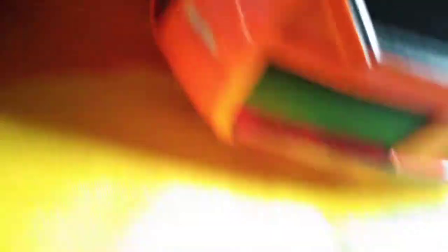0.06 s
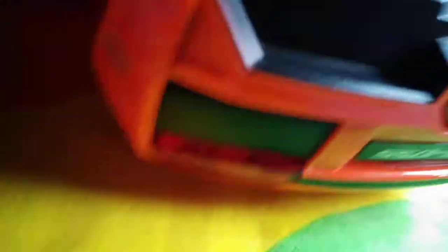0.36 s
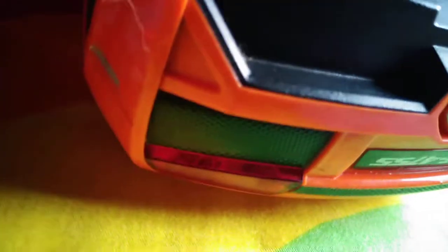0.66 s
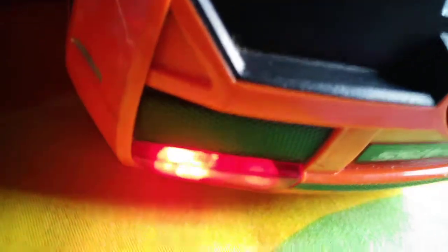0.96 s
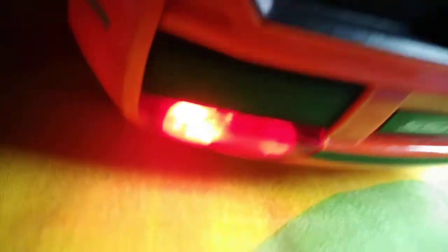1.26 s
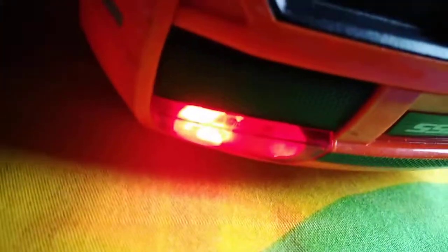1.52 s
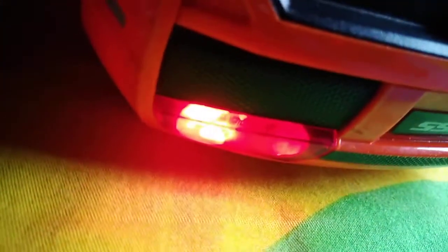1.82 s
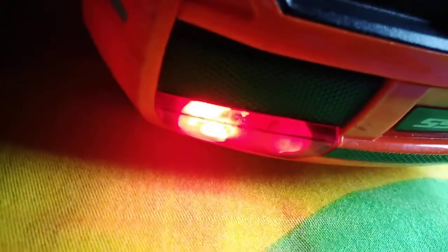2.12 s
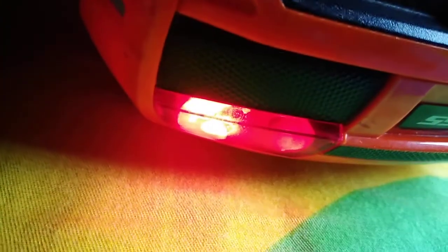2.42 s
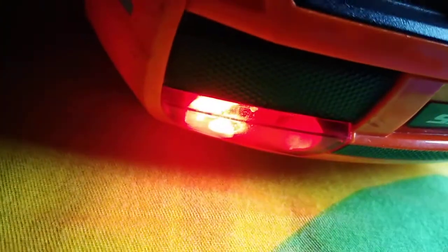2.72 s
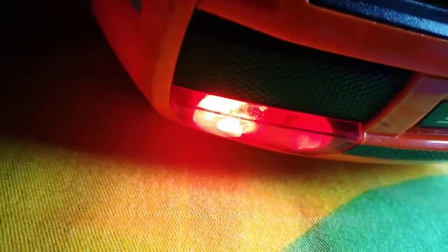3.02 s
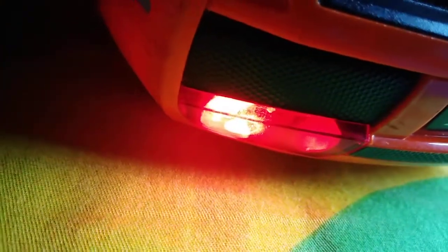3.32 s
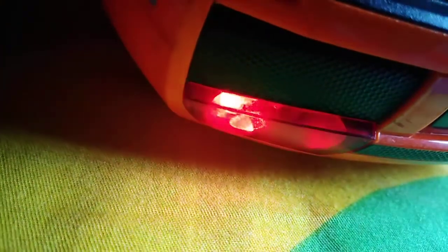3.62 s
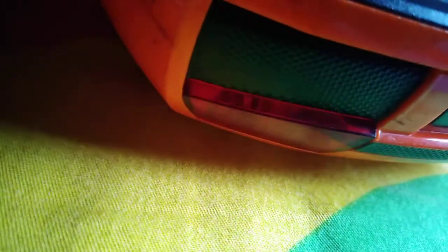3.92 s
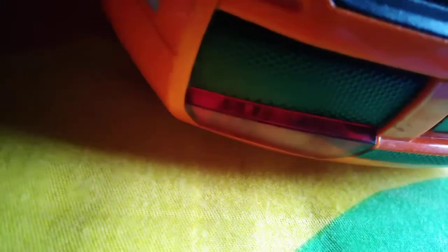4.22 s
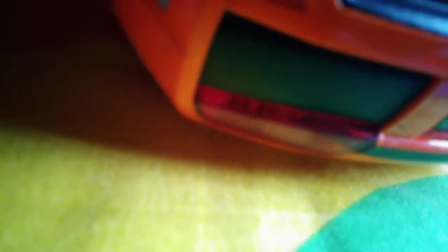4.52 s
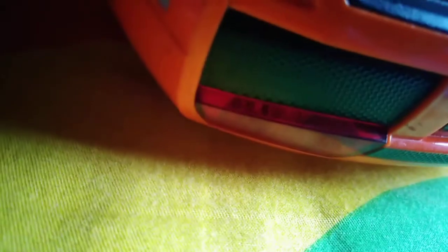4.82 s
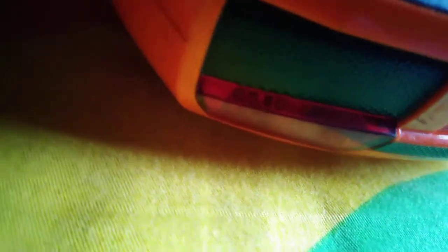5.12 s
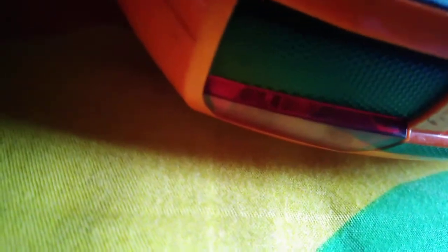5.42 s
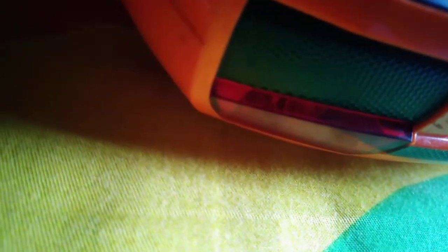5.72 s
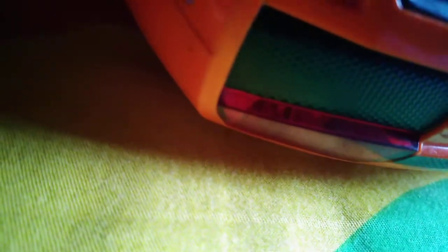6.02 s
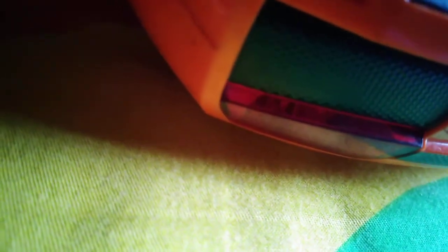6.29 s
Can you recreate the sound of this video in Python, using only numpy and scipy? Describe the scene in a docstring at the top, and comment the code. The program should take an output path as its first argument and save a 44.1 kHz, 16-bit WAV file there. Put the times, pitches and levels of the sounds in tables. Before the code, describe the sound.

A plastic toy car is handled close to the microphone in a small quiet room. After a brief rub of a hand and a few clicks, its electric motor spins up to a steady high whine, with gears chattering and the hollow body droning. A switch clicks and the gears wind down, falling in pitch. Another click and knock start a second run, which holds, then begins slowing with a few gritty wheel scrapes.

```python
"""In a small quiet room, a plastic toy car is handled close by and switched on twice.
Each time its gears whine up to speed, hold and coast down; the pitch is the rate at which teeth mesh.
Impacts of the loose teeth excite resonances: the hollow body drones and the thin walls chatter.
The slow gear groans and a wobbling wheel scrapes now and then; the switch and the shell click."""
import sys
import numpy as np
from scipy import signal
from scipy.fft import rfft, irfft, next_fast_len
from scipy.io import wavfile
from scipy.ndimage import uniform_filter1d

SR = 44100
rng = np.random.default_rng(int(sys.argv[2]) if len(sys.argv) > 2 else 0)


def generate_wav(signal):
    """Clip the signal to [-1, 1] and save it as 16-bit WAV at the path in sys.argv[1]."""
    frames = np.transpose(np.atleast_2d(signal))
    scaled = np.clip(frames, -1, 1) * 32767
    pcm = np.round(scaled).astype(np.int16)
    wavfile.write(sys.argv[1], SR, pcm)


N = 289031
T = np.arange(N) / SR
TEETH, WHEEL_RATIO = 12, 5  # teeth on the gear; its turns for one turn of the wheel
LET_GO_S, TAKE_UP_S = 0.043, 0.099  # the teeth go slack without current, and mesh again

# motor runs: (on [s], off [s], top tooth rate [Hz], speed at switch-on [share], spin-up [s], drag [Hz],
# drag eases from [s], easing [s], friction [Hz/s])
RUNS = [(.75, 3.219, 682, .12, .117, 39.4, 1.729, .172, 535),
        (4.135, 6.12, 677, .29, .14, 41, 4.135, .543, 488)]
# resonances of the hollow body: (frequency [Hz], level [dB])
BODY = [(18, -101), (30, -92), (86, -20), (154, -19), (314, -13), (342, -8), (405, -15.5), (569, -4.5),
        (620, 0), (687, 2.5), (828, -1), (1020, -12), (1250, -8), (1330, -11.5), (1750, -16), (2280, -63),
        (3850, -120)]


def amp(db):
    """Decibels to amplitude ratio."""
    return 10 ** (np.asarray(db) / 20)


def unit(x):
    """Normalisation to rms 1."""
    return x / np.sqrt(np.mean(x ** 2) + 1e-20)


def read(points, hz):
    """Interpolation on a log-frequency axis."""
    f, value = np.transpose(points)
    return np.interp(np.log(hz + 1), np.log(f + 1), value)


def noise():
    """Two uncorrelated white noises."""
    return rng.standard_normal((2, N))


def wander(hz):
    """Random modulation: noise of rms 1, low-passed at the given rate."""
    f = np.fft.rfftfreq(N, 1 / SR)
    return unit(irfft(rfft(rng.standard_normal(N)) / (1 + (f / hz) ** 4), N))


def colour(x, points, size=4096):
    """Source and filter: a causal response of unit energy imposes the given spectral shape."""
    hz = abs(np.fft.fftfreq(size, 1 / SR))
    log_gain = np.log(amp(np.maximum(read(points, hz), -100)))
    ring = np.fft.ifft(np.exp(np.conj(signal.hilbert(log_gain)))).real[:size // 2]
    return signal.oaconvolve(x, ring[None] / np.linalg.norm(ring), axes=1)[:, :N]


def echoes(x, t60, delay):
    """Diffuse reflections: a decaying noise response of unit energy, different on each side."""
    t = T[:int(1.2 * t60 * SR)]
    tail = rng.standard_normal((2, SR))[:, :len(t)] * amp(-60 * t / t60) * np.clip(t / delay - 1, 0, 1)
    return signal.oaconvolve(x, tail / np.linalg.norm(tail, axis=1, keepdims=True), axes=1)[:, :N]


def blows(times, levels_db, t60s):
    """Damped vibration after impacts: noise bursts that decay exponentially."""
    rows = zip(*np.broadcast_arrays(times, levels_db, t60s))
    return noise() * sum(amp(db - 60 * abs(T - s) / t60) * (T >= s) for s, db, t60 in rows)


def still_air(level_db=-80):
    """Ambient noise: the room's faint steady hiss, with a little low rumble."""
    # room noise: (frequency [Hz], level [dB])
    spectrum = [(18, -15), (30, -15), (229, 3), (1100, -18), (4070, -7), (7170, 0), (8590, -16),
                (14000, -26)]
    return amp(level_db) * colour(noise(), spectrum)


def sliding_hand(grip_s=0.0094):
    """Sliding friction: skin on the shell makes a noise that rises quickly and fades."""
    # hand strokes: (time [s], level [dB], t60 [s])
    strokes = [(.098, -49.5, 0.39), (.5, -79, 0.54)]
    # skin on plastic: (frequency [Hz], level [dB])
    skin = [(240, -66), (400, -37), (707, -10), (850, -58), (1270, -15), (1570, -28), (2050, -4),
            (3150, -15), (3840, -7), (6700, -1.5), (9160, -16), (9560, -36), (12000, -32), (15600, -73),
            (22000, -120)]
    pressure = 0
    for s, db, t60 in strokes:
        rise = np.exp(-(np.minimum(T - s, 0) / grip_s) ** 2)
        pressure = pressure + rise * amp(db - 60 * np.maximum(T - s, 0) / t60)
    return colour(noise() * pressure, skin)


def knocks():
    """Impact excitation: switch, shell and starting motor give dull knocks, each with a low thump."""
    # impacts: (time [s], knock level [dB], knock t60 [s], thump level [dB], thump t60 [s])
    hits = [(0.353, -49, 0.03, -85, .1), (0.373, -38, 0.04, -76, .1), (.640, -30, .045, -46, .12),
            (.655, -38, .12, -62, .12), (0.767, -19, 0.073, -28, .28), (3.2935, -13, 0.03, -42, .1),
            (3.303, -20, .07, -33, .12), (4.139, -12, .03, -21, .08), (4.164, -25, .03, -32, .07)]
    # spectra of knock and thump: (frequency [Hz], level [dB])
    knock = [(120, -60), (200, -67), (480, -6.5), (570, 2.5), (720, -0.5), (1980, -12.5), (2520, -14),
             (3410, -17.5), (6440, -17), (8180, -22), (9000, -53), (11700, -81), (19800, -120)]
    thump = [(30, -65), (100, -5.5), (220, -4), (350, 2.5), (600, -31)]
    s, knock_db, knock_t60, thump_db, thump_t60 = np.transpose(hits)
    return colour(blows(s, knock_db, knock_t60), knock) + colour(blows(s, thump_db, thump_t60), thump)


def snaps():
    """Brief impacts have broad spectra: the switch and gears snap brightly."""
    # impacts: (time [s], level [dB], t60 [s])
    hits = [(0.6395, -33, 0.1), (.6412, -17.5, .008), (0.7515, -23, 0.08), (3.2935, -8.5, 0.01),
            (4.043, -17.5, 0.022), (4.058, -31, .03)]
    # spectrum of a snap: (frequency [Hz], level [dB])
    spectrum = [(80, -50), (250, -10), (650, 1), (1300, 0), (2100, 7.5), (3100, -1), (4700, 8), (6100, -2),
                (7700, 4), (9000, -2), (14500, -18)]
    return colour(blows(*np.transpose(hits)), spectrum)


def latest_run():
    """Index of the run last switched on, at each moment."""
    return np.maximum(np.searchsorted([run[0] for run in RUNS], T, "right") - 1, 0)


def tooth_rate(coast_s=2.2, sag_hz=20, sag_at_s=.058, sag_half_s=.014):
    """Meshing frequency: the motor spins up against drag; dry and viscous friction slow it once off."""
    on, off, top_hz, head_start, spin_up, drag_hz, eases, easing, friction = np.array(RUNS)[latest_run()].T
    driven_t = np.clip(T, on, off)
    goal_hz = top_hz - drag_hz * np.exp(-np.maximum(driven_t - eases, 0) / easing)
    driven_hz = goal_hz * (1 - (1 - head_start) * np.exp(-(driven_t - on) / spin_up))
    kept = np.exp(-np.maximum(T - off, 0) / coast_s)
    # backlash: after switch-off the gear drops back through its play until the wheel catches it
    sag = sag_hz * np.exp(-.5 * ((T - off - sag_at_s) / sag_half_s) ** 2)
    return np.maximum(driven_hz * kept - friction * coast_s * (1 - kept) - sag, 1)


def force_db(pace, steady_db, surge_db, surge_s, octave_db, slack_db):
    """Impact level follows speed and load: starting strain peaks at surge_s, and slack teeth hit softly."""
    on, off = np.array(RUNS)[latest_run(), :2].T
    age = np.maximum(T - on, 0)
    strain = (age / surge_s * np.exp(1 - age / surge_s)) ** 2
    slack = np.clip((T - off) / LET_GO_S, 0, 1) + np.clip(1 - age / TAKE_UP_S, 0, 1)
    return steady_db + octave_db * np.log2(pace) + surge_db * strain + slack_db * slack


def impacts(turns, spread_db, grit):
    """A jittered impulse train, one strike a tooth, with friction noise in the ratio grit."""
    tooth = np.floor(TEETH * turns + .3 * wander(500))
    strikes = np.diff(np.maximum.accumulate(tooth), prepend=tooth[0]) > 0
    force = strikes * amp(spread_db * np.clip(rng.standard_normal(N), -2, 2))
    force = force / np.sqrt(uniform_filter1d(force ** 2, SR // 12) + 1e-6)
    return (force * rng.choice([-1, 1], (2, N)) + grit * noise()) / np.hypot(1, grit)


def body_drone(turns, pace, drive, boom_db, release_s=0.054):
    """Forced vibration: tooth impacts shake the hollow body, swaying with the gear and the wheel."""
    angle = 2 * np.pi * turns
    sway = unit(amp(1.5 * np.cos(angle) + np.cos(2 * angle) + np.cos(angle / WHEEL_RATIO)))
    drone = colour(sway * impacts(turns, spread_db=0, grit=0.74) * drive, BODY)
    # a broad low resonance booms while the motor pulls
    pulling = np.clip(1 - (T - np.array(RUNS)[latest_run(), 1]) / release_s, 0, 1)
    boom = signal.filtfilt(*signal.iirpeak(330, Q=0.6, fs=SR), drone * pulling)
    drone = drone + amp(boom_db) * boom
    bass = signal.sosfiltfilt(signal.butter(2, 190, fs=SR, output="sos"), drone)
    return drone - 0.83 * bass * (1 - pace)  # the deepest shaking dies as the gears slow


def loose_teeth(turns, pace, worn_db=2.8, worn_focus=6, oval_db=.65):
    """Amplitude modulation of impacts: a worn tooth hits harder once a turn, the oval gear twice."""
    angle = 2 * np.pi * turns
    wear = unit(amp(worn_db * np.exp(worn_focus * (np.cos(angle) - 1)) + oval_db * np.cos(2 * angle)))
    rubbing = 1 + 0.97 * (1 - pace)  # slow teeth rub more than they strike
    return wear * impacts(turns, spread_db=5.5, grit=rubbing) * amp(0.89 * wander(6.4))


def wall_chatter(strikes, turns, fizz_db, shell_db=-2):
    """The response depends on the point of impact: each tooth rings the walls in its own way."""
    # thin plastic walls, and the fizz of the tooth edges: (frequency [Hz], level [dB])
    shell = [(600, -26), (1000, -29), (1250, -6.5), (1650, -5), (2100, 2.5), (2680, 5.5), (2870, 4),
             (3120, -2.5), (3550, -0.5), (4250, 0.5), (7200, -0.5), (8350, -3), (8800, -25), (11000, -56)]
    fizz = [(5000, -38), (8400, 23.5), (9000, 14), (9800, 15), (11000, 10), (13000, 7.5), (14500, 1)]
    tooth = np.floor(TEETH * turns) % TEETH
    shaking = sum(echoes(strikes * (tooth == k), t60=0.034, delay=.0001) for k in range(TEETH))
    return amp(shell_db) * colour(shaking, shell) + amp(fizz_db) * colour(shaking, fizz)


def wall_modes(strikes, level_db=-1):
    """Normal modes: each damped resonance of the walls reaches the sides with its own phase and level."""
    # modes: (frequency [Hz], bandwidth [Hz], level [dB], left lead [rad], left minus right [dB])
    modes = [(1220, 76, 4.5, -1.9, 9), (1820, 70, 3, 3, 3), (2094, 63, 7, -4, 8.5),
             (2385, 180, 7.5, 2.5, 0), (2610, 110, -3, -5.5, -12), (3094, 135, 4, 1, -8),
             (4110, 150, 4, 3, -2.5), (4334, 74, 5.5, 0, 7), (4670, 120, 3.5, -1.5, -4),
             (5113, 92, 4.5, 2.5, 12), (5510, 120, 5.5, 2.5, 3), (5860, 110, 3.5, -0.5, -3),
             (6180, 76, 3.5, 1.5, 3), (6900, 120, 3, -2.5, -7), (7150, 74, 5.5, -1.5, -11),
             (7770, 83, 0, 3.5, -4), (8360, 70, -3, 1.5, -19), (10100, 120, -26, 5, -5)]
    ringing = np.zeros((2, N))
    for hz, width, db, lead, pan_db in modes:
        radius = np.exp(-np.pi * width / SR)
        pole = radius * np.exp(2j * np.pi * hz / SR)
        ring = 2 * amp(db + level_db) * signal.lfilter([1 - radius], [1, -pole], strikes + 1e-18)
        ringing += place(ring, lead, pan_db)
    return signal.sosfilt(signal.butter(5, [1000, 9300], "band", fs=SR, output="sos"), ringing)


def whine(turns, tooth_hz, pace, drone_db, flutter=.135, slow_flutter_db=6, loaded_db=-8):
    """Periodic forcing: a tone at the meshing frequency, and harmonics of the gear's turning rate."""
    # radiation of the gearbox: (tooth rate [Hz], level [dB])
    response = [(120, -80), (230, -58), (285, -42), (330, -49), (390, -42), (470, -31.5), (560, -27),
                (615, -22.2), (645, -22), (668, -19.3), (682, -15.8)]
    # modulation by the wheel: (depth in first run [share], depth in second run [share])
    wobble = [.06, .16]
    # gear orders: (multiple of turning rate, level in first run [dB], level in second run [dB])
    orders = [(4, 2.5, 0), (8, -12, 4), (15, -20, -12), (16, -1, -6), (24, -2, -9)]
    run = latest_run()
    wheel = np.array(wobble)[run] * np.cos(2 * np.pi * turns / WHEEL_RATIO)
    waver = (1 + flutter * wander(17) + wheel) * amp(slow_flutter_db * (1 - pace) * wander(30))
    pulling = np.clip(1 - (T - np.array(RUNS)[run, 1]) / LET_GO_S, 0, 1)
    grind_db = loaded_db * (1 - pace) * pulling  # under load, slow teeth grind rather than sing
    tone = amp(read(response, tooth_hz) + grind_db) * waver * np.exp(2j * np.pi * TEETH * turns)
    for k, *run_db in orders:
        order_db = drone_db + np.array(run_db)[run] + read(BODY, k * tooth_hz / TEETH)
        level = amp(order_db) * pace ** 2  # imbalance grows with speed squared
        tone = tone + level * unit(amp(3 * wander(75))) * np.exp(2j * np.pi * (k * turns + rng.random()))
    return tone


def gearbox(drone_surge_s=0.23, chatter_surge_s=0.082, mesh_s=.085):
    """One rotation drives all the gear sounds; returns the tones with the wall modes, and the rattle."""
    # tooth force, a row a run: (drone [dB], its surge [dB], chatter [dB], its surge [dB], boom [dB],
    # fizz [dB], chatter offset at switch-on [dB])
    forces = [(-29, -1, -24.5, 6.5, -52, -18, 2.5), (-30, 2, -24.5, 3, 0, -20, -5.5)]
    run = latest_run()
    drone_db, drone_surge, chatter_db, chatter_surge, boom_db, fizz_db, onset_db = np.array(forces)[run].T
    tooth_hz = tooth_rate()
    pace = tooth_hz / tooth_hz.max()
    turns = np.cumsum(tooth_hz * (1 + .002 * wander(25))) / SR / TEETH
    started = np.clip((T - RUNS[0][0]) / .005, 0, 1)
    drone_db = force_db(pace, drone_db, drone_surge, drone_surge_s, octave_db=2, slack_db=-1)
    chatter_db = force_db(pace, chatter_db, chatter_surge, chatter_surge_s, octave_db=4, slack_db=-4.5)
    chatter_db += onset_db * np.clip(1 - (T - np.array(RUNS)[run, 0]) / mesh_s, 0, 1)
    # harder blows sound brighter
    fizz_db = force_db(pace, fizz_db, surge_db=3.5, surge_s=chatter_surge_s, octave_db=1, slack_db=-1)
    drone = body_drone(turns, pace, started * amp(drone_db + 5), boom_db)
    strikes = loose_teeth(turns, pace) * started * amp(chatter_db + 3.5) + catching_teeth()
    chatter = wall_chatter(strikes, turns, fizz_db)
    tone = whine(turns, tooth_hz, pace, drone_db) + groans(turns)
    tones = started * np.sqrt(2) * place(tone, lead_rad=0.44, pan_db=2.5)
    return tones + wall_modes(strikes[0]), drone + chatter


def wheel_scrapes(body_db=-4):
    """Friction noise: the wheel rubs its arch in short gritty strokes, which also shake the body."""
    # contacts: (middle time [s], level [dB], half length [s])
    contacts = [(0.809, -20, 0.0053), (0.839, -16.5, 0.0062), (0.867, -16.5, 0.0084), (0.897, -21, 0.0069),
                (0.932, -20, 0.017), (0.968, -22, 0.0068), (1.015, -17.5, 0.0094), (1.1, -22, 0.0068),
                (1.146, -20, 0.013), (1.292, -25.5, 0.024), (1.761, -22, 0.011), (1.888, -22.5, 0.0078),
                (3.146, -21, 0.0068), (3.306, -24, 0.0058), (3.411, -22.5, 0.0074), (3.502, -22.5, 0.0098),
                (3.57, -29, 0.017), (3.63, -31.5, 0.026), (3.756, -37, 0.012), (3.835, -35, 0.014),
                (5.047, -24, 0.011), (5.736, -27, 0.0026), (6.207, -11, 0.0072), (6.295, -17, 0.012),
                (6.371, -21, 0.02), (6.439, -21.5, 0.012), (6.49, -23.5, 0.017)]
    # wheel on arch: (frequency [Hz], level [dB])
    spectrum = [(150, -29), (700, -17), (1700, -12), (2200, 1.5), (3200, -7), (5600, 0), (8000, -7.5),
                (10000, -15.5), (14500, -33.5)]
    pressure = sum(amp(db) * np.exp(-.5 * ((T - s) / half) ** 2) for s, db, half in contacts)
    rub = noise() * pressure * amp(3 * wander(600))
    return colour(rub, spectrum) + amp(body_db) * colour(rub, BODY)


def catching_teeth(gain_db=0.5, t60=0.0076):
    """Transient excitation: single teeth catch and tick hard."""
    # catches: (time [s], level [dB])
    ticks = [(0.836, -14), (0.863, -4), (0.9325, -6), (0.9583, -14), (1.021, -6), (1.158, -7.5),
             (1.585, -18), (1.8535, -9), (1.8792, -8), (1.9406, -12), (2.0108, -6.5), (2.121, -17),
             (2.5773, -7), (2.9363, -10), (3.143, -14), (3.1768, -4.5), (3.304, -10), (3.407, -11),
             (3.503, -15), (5.1513, -14), (5.5715, -8), (5.641, -8), (5.726, -9), (6.12, -9)]
    return amp(gain_db) * blows(*np.transpose(ticks), t60)


def groans(turns, rough_db=3.5, slip_rad=.55):
    """The loose gear judders on single harmonics of its rotation, modulated in level and phase."""
    # judders: (middle time [s], multiple of turning rate, level [dB], half length [s])
    judders = [(0.87, 19, -19.5, 0.012), (3.493, 24, -27, 0.017), (3.622, 36, -33, 0.052),
               (3.646, 24, -18.5, 0.04), (3.755, 36, -26, 0.028), (3.758, 12, -31, 0.022),
               (3.833, 36, -31, 0.02), (3.855, 48, -30, 0.019), (3.905, 36, -30, 0.025),
               (3.912, 48, -29.5, 0.017), (4.28, 19, -22, 0.01), (4.325, 19, -22, 0.017),
               (6.282, 16, -23, 0.015), (6.337, 16, -20, 0.016), (6.537, 24, -25, 0.02)]
    tone = 0
    for s, k, db, half in judders:
        swell = amp(db) * np.exp(-.5 * ((T - s) / half) ** 2)
        tone = tone + swell * np.exp(2j * np.pi * (k * turns + rng.random()))
    return tone * unit(amp(rough_db * wander(90))) * np.exp(1j * slip_rad * wander(50))


def shell_notches(x):
    """Band rejection: the shell's sound dips in two narrow bands."""
    for hz, q in [(2930, 13.8), (3560, 33)]:
        x = signal.lfilter(*signal.iirnotch(hz, q, SR), x)
    return x


def room(x, low_db=-10, high_db=-12, split_hz=1800):
    """Reverberation of a furnished room: the treble is absorbed first."""
    low = signal.sosfilt(signal.butter(2, split_hz, "low", fs=SR, output="sos"), x)
    high = signal.sosfilt(signal.butter(2, split_hz, "high", fs=SR, output="sos"), x)
    return amp(low_db) * echoes(low, t60=.27, delay=.005) + amp(high_db) * echoes(high, t60=.2, delay=.003)


def place(tone, lead_rad, pan_db):
    """Phase and level differences place a complex tone between left and right."""
    return np.array([tone * amp(pan_db / 2), tone * np.exp(-1j * lead_rad) * amp(-pan_db / 2)]).real


def two_sides(pair, lead_rad=0.62):
    """Partial coherence: the sides share the bass but hear different faces of the shell in the treble."""
    # likeness of the sides: (frequency [Hz], correlation [-1 to 1])
    likeness = [(50, 0.75), (250, 0.73), (700, 1), (950, 0.91), (1250, 0.56), (1650, -0.33), (2050, 0.17),
                (2400, -0.12), (2720, -0.18), (2850, -0.49), (3100, 0.49), (3400, 0.15), (3560, 0.094),
                (3800, 0.15), (5300, 0.034), (7000, 0.18), (14000, -0.057)]
    # balance of the sides: (frequency [Hz], left minus right [dB])
    balance = [(60, -12), (110, 2), (200, -6.5), (380, 0), (700, 1), (1290, 1.5), (2380, 0.5), (4390, 2.5),
               (8100, -1), (15000, -0.5)]
    size = next_fast_len(N + SR)
    hz = np.fft.rfftfreq(size, 1 / SR)
    left, other = rfft(pair, size)
    same = np.clip(read(likeness, hz), -1, 1)
    tilt = amp(read(balance, hz) / 2)
    lag = np.exp(-1j * lead_rad * np.exp(-((hz - 700) / 350) ** 2))
    right = (same * left + np.sqrt(1 - same ** 2) * other) * lag
    return irfft(np.array([left * tilt, right / tilt]), size)[:, :N]


def scene():
    """Superposition of the car's tones, its noises with their reflections, and the still air."""
    tones, rattle = gearbox()
    noises = shell_notches(rattle + wheel_scrapes() + snaps() + knocks() + sliding_hand())
    return tones + two_sides(noises + room(noises) + still_air())


def record(dry, ceiling=.92, edge_hz=14400):
    """Soft saturation rounds the highest peaks; a low-pass filter limits the band."""
    rounded = dry / (1 + (dry / ceiling) ** 6) ** (1 / 6)
    low_pass = signal.firwin(401, edge_hz, window=("kaiser", 9), fs=SR)
    return signal.oaconvolve(rounded, low_pass[None], "same")


dry = scene()
out = record(dry)
generate_wav(out)
```